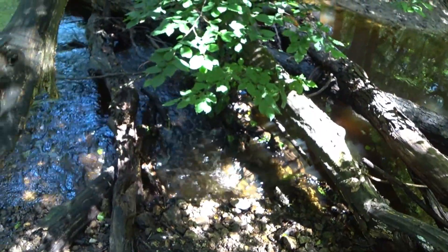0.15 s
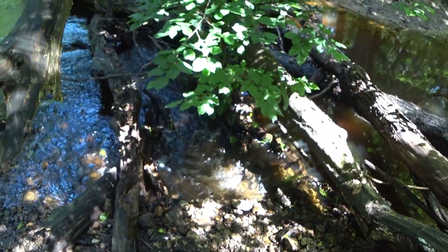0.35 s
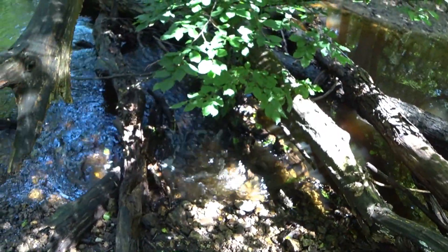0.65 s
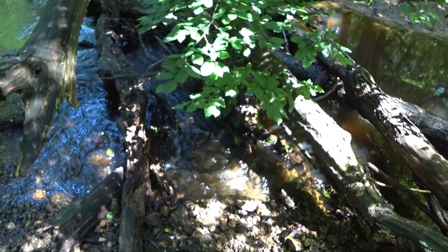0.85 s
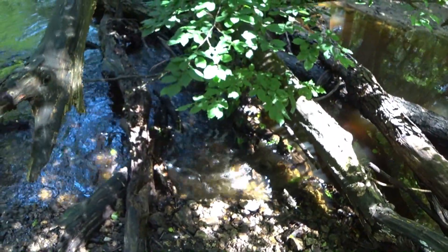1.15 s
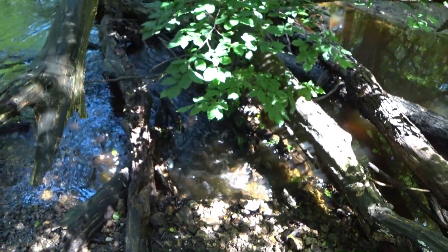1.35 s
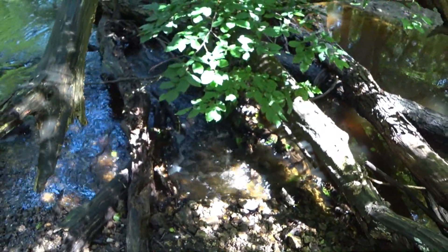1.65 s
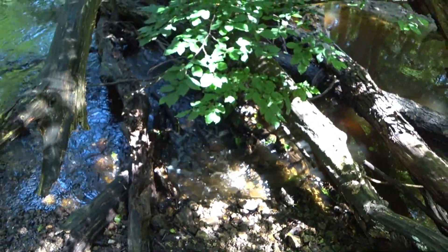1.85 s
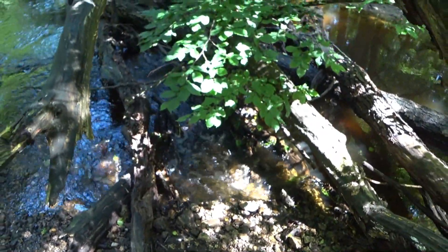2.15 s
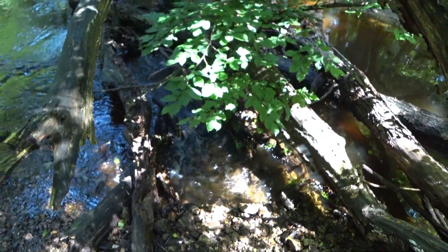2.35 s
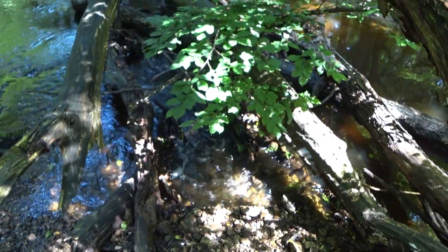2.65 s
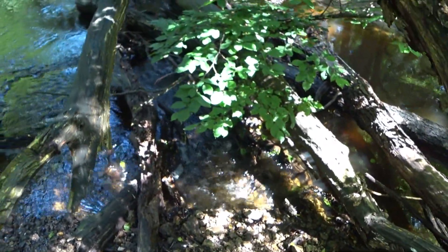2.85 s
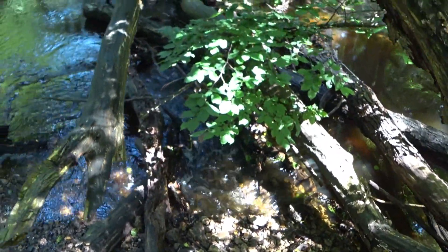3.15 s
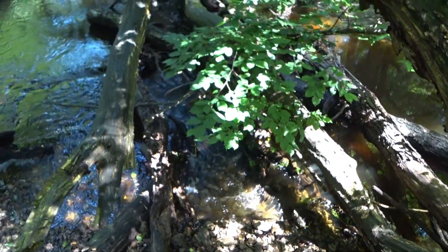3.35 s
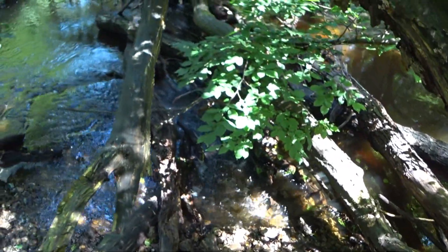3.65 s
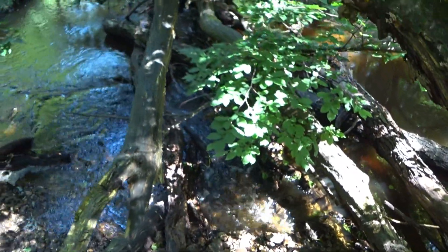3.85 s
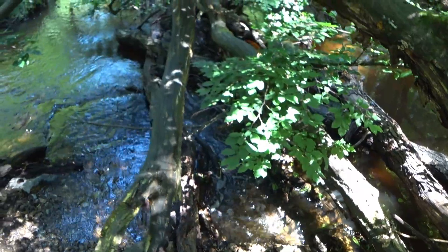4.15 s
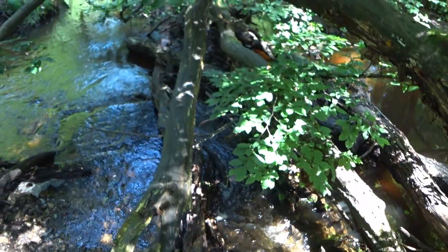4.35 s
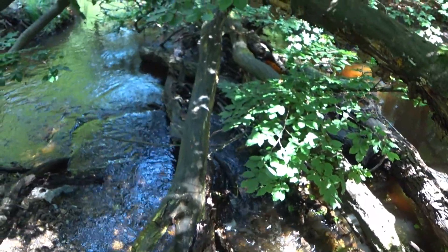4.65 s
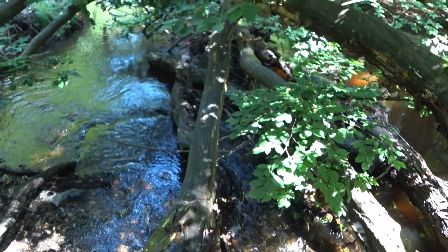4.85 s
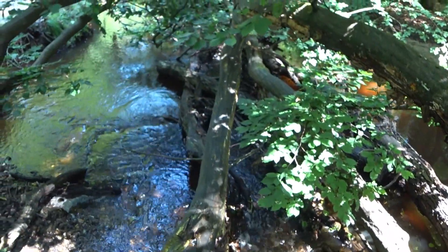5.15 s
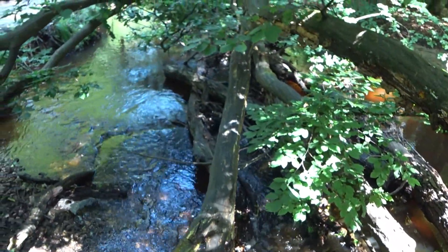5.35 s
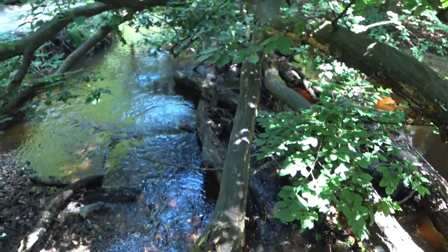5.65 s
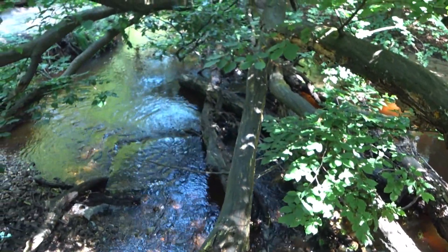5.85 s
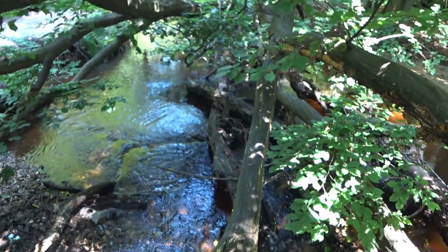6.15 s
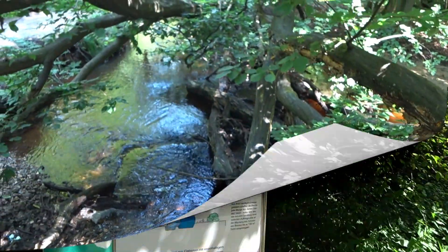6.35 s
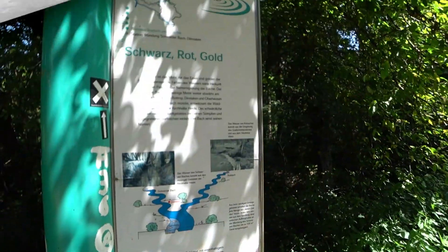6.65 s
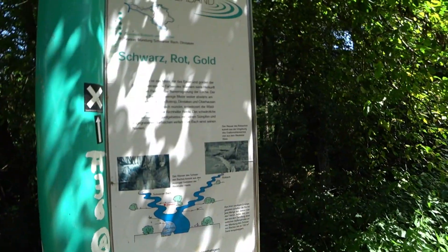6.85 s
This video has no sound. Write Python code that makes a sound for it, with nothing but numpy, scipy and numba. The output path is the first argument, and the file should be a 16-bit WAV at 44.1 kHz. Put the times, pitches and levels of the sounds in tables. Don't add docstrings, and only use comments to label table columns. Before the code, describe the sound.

Shallow water babbles over pebbles and logs, heard in stereo from a few steps away, with countless small ringing bubbles and occasional deeper gulps. One sharp tick stands out a little past the middle. A breeze adds muffled low puffs. The brook gradually fades out, a tiny gap follows, and a soft, wide forest rustle with sparse ticks fades in.

```python
import sys
import numpy as np
from scipy import signal
from scipy.fft import rfft, irfft
from scipy.io import wavfile
from scipy.ndimage import uniform_filter1d
from numba import njit

SR = 44100
rng = np.random.default_rng(int(sys.argv[2]) if len(sys.argv) > 2 else 0)


def bounce(signal):
    frames = np.transpose(np.atleast_2d(signal))
    limited = np.clip(frames, -1, 1)
    pcm = np.round(limited * 32767).astype(np.int16)
    wavfile.write(sys.argv[1], SR, pcm)


def level_to_linear(level):
    exponent = np.asarray(level, float) / 20
    return 10 ** exponent


N = 308690
TIME = np.arange(N) / SR
HZ = np.fft.rfftfreq(N, 1 / SR)
FADE_OUT_S, SILENT_S, FADE_IN_S, FULL_S = 4.86, 6.285, 6.268, 6.64
GAP_START_S, GAP_END_S = 6.2585, 6.288


def read(table, hz):
    pitch_hz, value = np.transpose(table)
    return np.interp(np.log(hz + 1), np.log(pitch_hz + 1), value)


def level(x, db):
    return x * level_to_linear(db) / np.sqrt(np.mean(x ** 2))


def walk(rate):
    hold = max(int(SR / rate), 2)
    x = np.repeat(rng.standard_normal(N // hold + 1), hold)
    x = uniform_filter1d(uniform_filter1d(x, hold), hold)[:N]
    x = x - uniform_filter1d(x, size=SR // 3)
    return x / x.std()


def fade_db(s, floor):
    return 20 * np.log10(np.clip((SILENT_S - s) / (SILENT_S - FADE_OUT_S), floor, 1))


@njit
def ring(start, pole, glide, left, right, rise, fade):
    out = np.zeros((2, N))
    for b in range(len(start)):
        z, turn, lack, size = 1 + 0j, pole[b], 1., 1.
        for i in range(start[b], N):
            z, turn = z * turn, turn * glide[b]
            lack, size = lack * rise[b], size * fade[b]
            out[0, i] += (1 - lack) * size * (z * left[b]).imag
            out[1, i] += (1 - lack) * size * (z * right[b]).imag
            if size < .004:
                break
    return out


# pitch_hz [Hz], side_minus_mid_db [dB]
PORTS = [(60, -20.5), (110, -16), (200, -11), (380, -8.5), (700, -6.5), (1290, -5.5), (2380, -8),
         (4400, -15), (8120, -19), (15000, -14.5)]


def bubbles(s, db, hz, cycles, climb, ahead=0.83, spread=0.44, rise_cycles=1.0, pan_db=0.0, vary=0.31):
    chance = rng.standard_normal((len(s), 4)).T
    step = 2 * np.pi * np.minimum(hz, .4 * SR) / SR
    life = np.maximum(cycles * np.exp(vary * chance[0]), .3) * SR / hz
    glide = np.exp(1j * step * climb * np.exp(.5 * chance[1]) / life)
    angle = np.arctan(level_to_linear(read(PORTS, hz))) * (ahead + spread * chance[2])
    lead = np.exp(1j * angle)
    pan = level_to_linear(pan_db * chance[3] / 2 - 0.52)
    start = np.clip(s * SR, 0, N - 1).astype(np.int64)
    rise, fade = np.exp(-hz / SR / rise_cycles), np.exp(-1 / life)
    return ring(start, np.exp(1j * step), glide, level_to_linear(db) * lead * pan, level_to_linear(db) / lead / pan, rise, fade)


def swarm(colour, busy, count, cycles, climb, scatter_db, surge, surge_rate, spread=0.52):
    crowd = np.cumsum(busy * np.exp(surge * walk(surge_rate)))
    chance = rng.random((count, 3)).T
    s = np.interp(chance[0] * crowd[-1], crowd, TIME)
    hz = 280 * 55 ** (chance[1] ** .7)
    db = read(colour, hz) + 10 * np.log10(hz ** 2 / (chance[1] + .001) ** .3)
    luck = np.minimum(-np.log(chance[2]), 4)
    return level(bubbles(s, db + scatter_db * luck, hz, cycles, climb, spread=spread), 0)


def wash(colour, swell_db, flicker_db, ahead, diffuse, extra_db=0., lo_hz=117.4):
    mid, other = (rfft(rng.standard_normal(N)) * level_to_linear(read(colour, HZ)) for _ in range(2))
    side = level_to_linear(read(PORTS, HZ) + extra_db) * (1j * ahead * mid + diffuse * other)
    stereo = np.array([mid + side, mid - side])
    out, swell = 0, walk(9.7)
    for hz in lo_hz * 2 ** np.arange(0, 8.1, .5):
        band = np.cos(np.pi * np.clip(np.log2((HZ + 1) / hz), -.5, .5)) ** 2
        own_db = (swell_db * swell + flicker_db * walk(25)) * min(hz / 1500, 1, 6000 / hz)
        out = out + level_to_linear(own_db) * irfft(band * stereo, N)
    return level(out, 0)


def banks(x, echo_s, echo_db=-10, tail_s=0.003, tail_db=-11):
    t = TIME[:3000]
    blur = rng.standard_normal((2, len(t))) * np.exp(-t / tail_s) * (t > .001)
    blur = blur * level_to_linear(tail_db) / np.sqrt(np.sum(blur ** 2, axis=1, keepdims=True))
    blur[:, 0] += 1
    blur[:, int(echo_s * SR)] += level_to_linear(echo_db)
    return signal.fftconvolve(x, blur, axes=1)[:, :N]


def splashes(table, hold_s, strength, span_db):
    s, db = np.transpose(table)[:2]
    kicks = np.zeros(N)
    before_fade_db = db - fade_db(s, .05)
    np.add.at(kicks, (s * SR).astype(int), level_to_linear(np.minimum(before_fade_db + span_db, 3.5)))
    keep = np.exp(-1 / (hold_s * SR))
    return 1 + strength * signal.lfilter([1], [1, -keep], kicks)


# start_s [s], flow_db [dB], spray_brightness_db [dB]
FLOW = [
    (0, -32, -2.5),
    (1, -33.5, 1),
    (2, -33.5, 0),
    (3, -33, -0.86),
    (4, -34, -1),
    (5, -33, -1.5),
    (5.6, -33, -1.3),
    (6.2, -35.5, -1),
]
# pitch_hz [Hz], level_db [dB per Hz]
BROOK = [(59, -51.5), (100, 1), (186, -14), (262, -59), (353, -5.5), (541, -11.5), (699, -0.5), (829, -5.5),
         (1050, 1.5), (1190, -3.5), (1570, 1), (2900, 1), (7650, -2.5), (10300, -7), (15100, -23.5),
         (16500, -29)]


def brook(voiced, struck):
    s, flow_db, spray_db = np.transpose(FLOW)
    churn = splashes(voiced, hold_s=.014, strength=.9, span_db=25)
    spray = splashes(struck, hold_s=.002, strength=7, span_db=21)
    gurgle = swarm(BROOK, churn, count=12000, cycles=7, climb=.05, scatter_db=3.2, surge=.3, surge_rate=18)
    fizz = swarm(BROOK, spray, count=9000, cycles=.55, climb=.02, scatter_db=2.8, surge=.45, surge_rate=45)
    near = level_to_linear(-1.7) * banks(gurgle, .0041) + level_to_linear(-6.0) * banks(fizz, .0033)
    far = wash(BROOK, swell_db=0.24, flicker_db=0.37, ahead=1.0, diffuse=0.35)
    water = near + level_to_linear(-1.08) * far
    top = signal.sosfiltfilt(signal.butter(1, 3500, "high", fs=SR, output="sos"), water)
    flurry = spray ** .24 * level_to_linear(1.1 * walk(20))
    water = water + (flurry * level_to_linear(np.interp(TIME, s, spray_db)) - 1) * top
    return water * level_to_linear(np.interp(TIME, s, flow_db))


# pitch_hz [Hz], peak_db [dB]
LESSER = [(450, -45), (900, -36), (2600, -29.5), (5000, -26.5), (8000, -27.5), (11000, -33)]


def lesser(count):
    when, size = rng.random((count, 2)).T
    s = when * GAP_START_S
    low_hz, high_hz = LESSER[0][0], LESSER[-1][0]
    hz = low_hz * (high_hz / low_hz) ** size
    luck = rng.standard_normal((count, 2)).T
    db = read(LESSER, hz) + 1.5 * luck[0] + fade_db(s, .01)
    ring_cycles = 9.2 * np.exp(0.49 * luck[1])
    return np.transpose([s, db, hz, ring_cycles])


# start_s [s], peak_db [dB], pitch_hz [Hz], ring_cycles [cycles]
GLUGS = [(0.1028, -33, 680, 7.2), (0.1835, -33, 687, 8.4), (0.416, -32.5, 926, 4.4),
         (0.55, -35.5, 720, 7.3), (1.1011, -35.5, 855, 14), (1.1804, -40, 442, 3.4), (1.363, -25, 1066, 11),
         (1.71, -30, 780, 4.7), (2.0024, -34.5, 702, 12), (2.1566, -32.0, 1006, 10),
         (2.4355, -33.5, 1180, 16), (2.5201, -40, 636, 9.6), (2.9039, -44.5, 501, 15),
         (3.0221, -32.0, 780, 2.7), (3.1892, -30.5, 1080, 7.6), (3.191, -33.5, 707, 9.9),
         (3.5416, -33.5, 843, 11), (3.9468, -38, 534, 5.6), (4.1138, -43, 520, 15), (4.383, -33, 1027, 14),
         (4.5173, -35, 955, 13), (4.5945, -32.5, 970, 9.7), (4.6465, -34, 793, 15),
         (4.8926, -26.5, 660, 6.1), (4.936, -32, 955, 4.9), (5.0334, -31.5, 1040, 15),
         (5.1095, -38.5, 655, 12), (5.3968, -35, 1090, 5.8), (5.7081, -36, 1150, 14)]
PLIPS = [(0.2493, -29, 1660, 19), (0.619, -26.5, 1510, 6.3), (1.0003, -21.5, 2760, 14),
         (1.168, -28.5, 1984, 14), (1.2853, -25.5, 1770, 5.9), (1.4521, -24.5, 2400, 8.4),
         (1.5055, -26, 2370, 19), (1.694, -24, 2250, 6), (1.718, -30, 1460, 13), (1.985, -25.5, 1380, 7.4),
         (2.005, -29.0, 1721, 12), (2.2079, -29, 1540, 7.3), (2.3346, -23, 3910, 7.4),
         (2.9233, -30.0, 1850, 15), (3.3734, -24.5, 2728, 4.3), (3.5113, -25.5, 2280, 11),
         (3.5274, -26.5, 2240, 17), (3.5465, -28.5, 1380, 12), (3.6964, -23, 3090, 13),
         (4.0387, -23.5, 2393, 10), (4.432, -27, 2410, 22), (4.4597, -24, 2400, 7.8),
         (4.5303, -25, 1780, 5.4), (4.934, -27, 1510, 11), (4.9342, -24.0, 2372, 7.5),
         (4.9342, -22, 3940, 4.4), (4.9526, -21.5, 2810, 4.2), (5.1413, -23.5, 3110, 17),
         (5.6071, -34.0, 2140, 7.4), (5.9326, -39.5, 2090, 22)]
TICKS = [(0.616, -19.5, 7600, 16), (0.6662, -18.5, 7330, 6.2), (0.6729, -20.5, 5600, 10),
         (0.7001, -19, 7890, 4.4), (0.9415, -21, 7100, 4.9), (0.9591, -21, 5450, 11),
         (1.0593, -21.5, 3900, 14), (1.1957, -21.5, 7300, 12), (1.549, -19.5, 9220, 11.2),
         (1.6478, -18.5, 5700, 5.9), (1.709, -21.5, 7800, 17), (2.2155, -18, 4650, 4.8),
         (2.337, -19.5, 8700, 6.8), (2.4594, -17.5, 4730, 9.1), (2.4915, -21, 6050, 15.2),
         (2.5436, -19, 7900, 7.3), (2.887, -22, 3720, 7.8), (3.0262, -22, 5030, 9.9),
         (3.3953, -19, 6650, 14), (3.617, -14, 5300, 2.9), (3.7131, -20, 3730, 9),
         (4.1864, -18.5, 4100, 8.1), (4.1871, -6, 6480, 2.9), (4.254, -22, 3950, 6.6),
         (4.3614, -22.5, 6840, 24), (4.7645, -21.5, 9300, 6.1), (5.1438, -20, 5000, 10),
         (5.482, -23, 3570, 8), (5.6009, -26.5, 3620, 8.5), (6.0557, -39.5, 3840, 18)]
TWIGS = [
    (6.5947, -41, 1480, 6.4),
    (6.5952, -34, 3150, 5.6),
    (6.667, -34, 3280, 4.6),
    (6.839, -34, 3200, 6),
]


def single_sounds():
    singles = np.vstack([GLUGS, PLIPS, TICKS, TWIGS, lesser(count=260)])
    struck = singles[singles[:, 2] > 2700]
    return singles, struck


def near_bubbles(singles, struck):
    s, db, hz, ring_cycles = singles.T
    climb = 0.04 * (1000 / hz) ** 0.21
    tones = bubbles(s, db + 7.0, hz * (1 - climb), ring_cycles / 1.52, climb,
                    rise_cycles=ring_cycles / 5.6, vary=0.066)
    s, db, hz, _ = struck.T
    snaps = bubbles(s, db - 12.0, 1.2 * hz, 1.0, .01, rise_cycles=0.5)
    return banks(tones + snaps, 0.0063, echo_db=-27, tail_s=0.0058, tail_db=-12)


# pitch_hz [Hz], level_db [dB per Hz]
GUST = [(8.8, -58), (15, 11), (33, 3.5), (54, 11.5), (91, 7.5), (184, -26.5), (220, -7.5), (290, -36),
        (480, -120)]
# top_s [s], peak_db [dB], rise_s [s], fall_s [s]
GUSTS = [
    (1.19, -48.5, .1, 0.029),
    (1.73, -56, .04, 0.49),
    (3.4, -52, 0.17, 0.036),
    (4.04, -45, 0.018, .06),
    (4.28, -45.5, .05, 0.067),
    (4.56, -47.5, 0.087, 0.054),
    (4.83, -56, .03, .04),
    (5.755, -41.5, 0.022, 0.074),
    (6.09, -47.5, .05, .08),
    (6.88, -53, .03, 0.1),
]


def breeze(out, back):
    brook_db, wood_db, flutter_db = -56, -56, 1.0
    steady = np.where(TIME < SILENT_S, level_to_linear(2 * brook_db), level_to_linear(2 * wood_db))
    power = level_to_linear(2 * flutter_db * walk(11)) * steady
    for s, peak_db, rise_s, fall_s in GUSTS:
        slope_s = np.where(TIME < s, rise_s, fall_s)
        power = power + level_to_linear(2 * peak_db) * np.exp(-np.abs(TIME - s) / slope_s * 2)
    db = 10 * np.log10(power)
    colour = level_to_linear(read(GUST, HZ)) * (HZ < 300)
    mid, side = (irfft(rfft(rng.standard_normal(N)) * colour, N) for _ in range(2))
    wind = level(mid + level_to_linear(-20) * side * np.array([[1], [-1]]), .3)
    deep = signal.sosfiltfilt(signal.butter(2, 45, fs=SR, output="sos"), wind)
    wind = wind + (level_to_linear(1.1 * (db + 55.5)) - 1) * deep
    return wind * level_to_linear(db) * (out + back)


# pitch_hz [Hz], level_db [dB per Hz]
WOOD = [(35, -32), (60, -1), (120, -13.5), (350, -14.5), (475, -20.5), (559, -17), (874, -19),
        (1030, -20.5), (3600, -13.5), (5870, -21.5), (6760, -15), (14000, -35), (16500, -59)]


def wood():
    leaves = swarm(WOOD, 1, count=12000, cycles=2.5, climb=.01, scatter_db=1.5, surge=.4, surge_rate=25,
                   spread=1.8)
    far = wash(WOOD, swell_db=0.7, flicker_db=1.0, ahead=0.66, diffuse=1.3, extra_db=3.0, lo_hz=80.4)
    return level(level_to_linear(-3.0) * banks(leaves, 0.0039) + far, -44)


TURN_DB = [0.7, -.6, 1.5]


def scene():
    out = np.clip((SILENT_S - TIME) / (SILENT_S - FADE_OUT_S), 0, 1) ** 0.92 * (TIME < GAP_START_S)
    back = np.clip((TIME - FADE_IN_S) / (FULL_S - FADE_IN_S), 0, 1) ** 1.35 * (TIME > GAP_END_S)
    singles, struck = single_sounds()
    water = brook(np.vstack([GLUGS, PLIPS]), struck) * out + near_bubbles(singles, struck)
    turn_db = np.where(TIME < SILENT_S, np.interp(TIME, [0, SILENT_S], TURN_DB[:2]), TURN_DB[2])
    turned = (water + wood() * back) * level_to_linear(np.outer([.5, -.5], turn_db))
    hiss = 3e-6 * rng.standard_normal((2, N))
    return turned + breeze(out, back) + hiss


def top_cut(x):
    return signal.sosfilt(signal.butter(12, 16710, fs=SR, output="sos"), x)


def record(dry):
    cut = signal.sosfilt(signal.ellip(12, .2, 80, 15880, fs=SR, output="sos"), dry)
    return top_cut(cut)


dry = scene()
out = record(dry)
bounce(out)
```